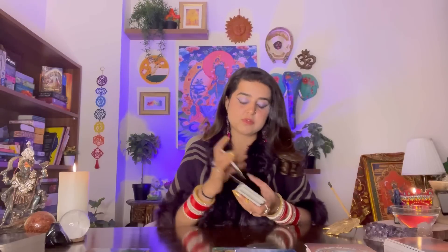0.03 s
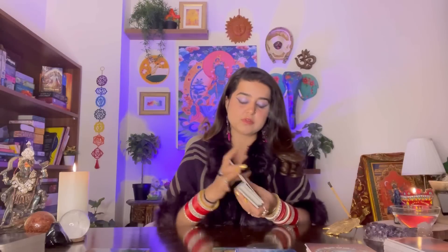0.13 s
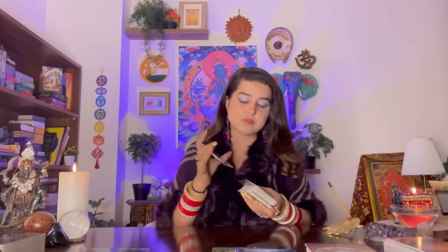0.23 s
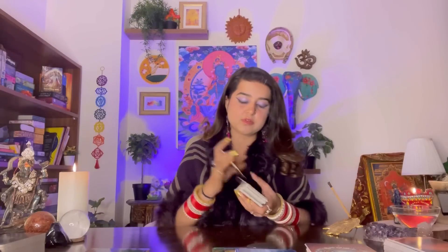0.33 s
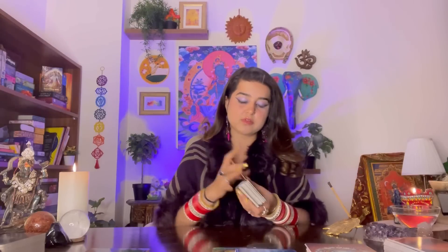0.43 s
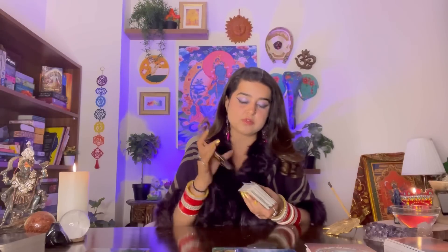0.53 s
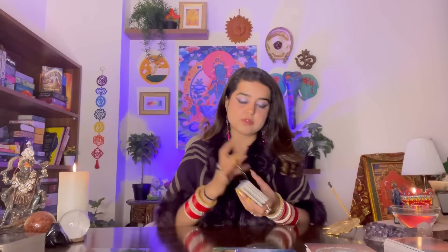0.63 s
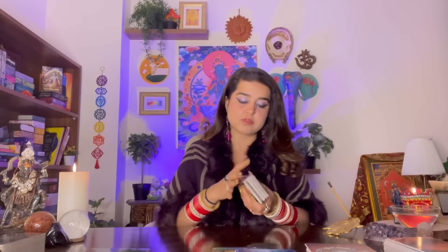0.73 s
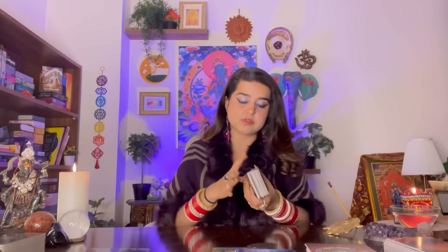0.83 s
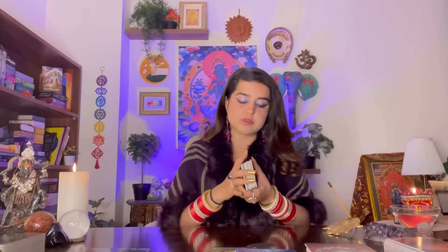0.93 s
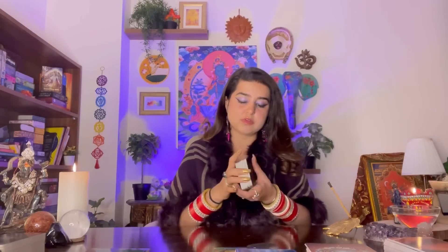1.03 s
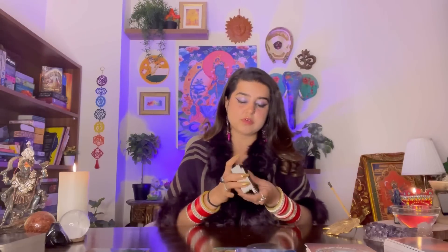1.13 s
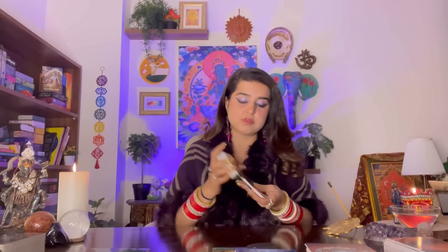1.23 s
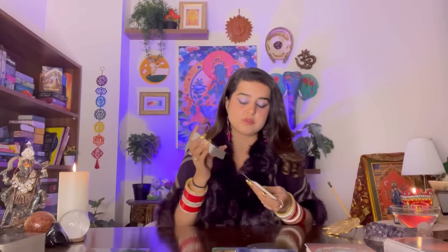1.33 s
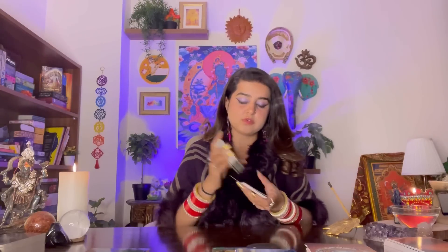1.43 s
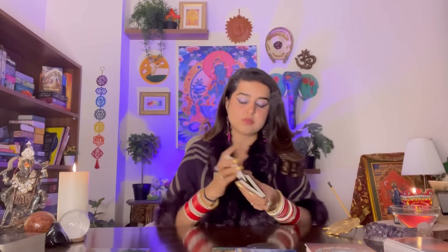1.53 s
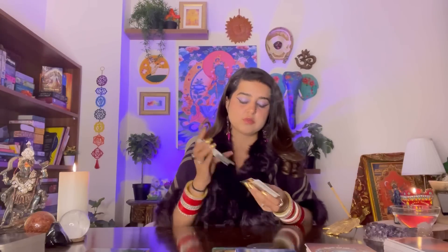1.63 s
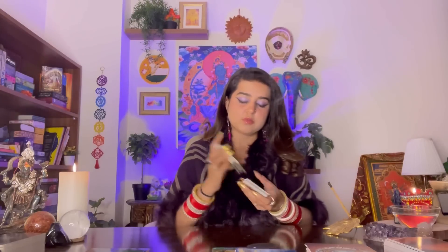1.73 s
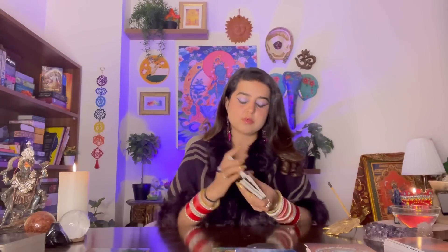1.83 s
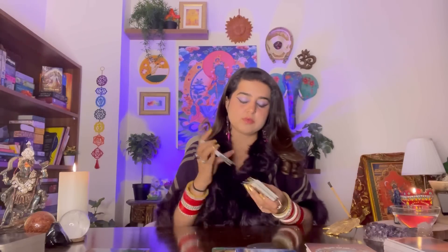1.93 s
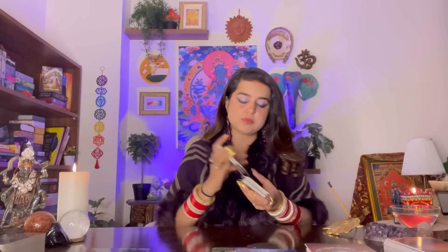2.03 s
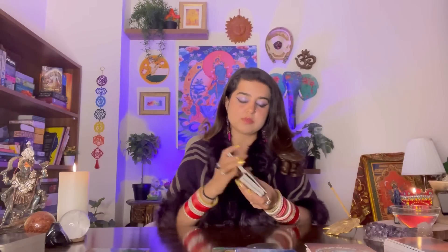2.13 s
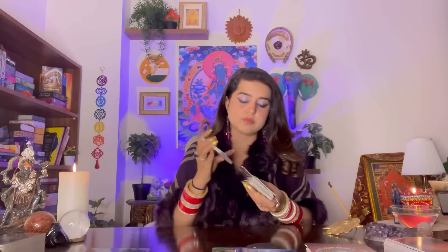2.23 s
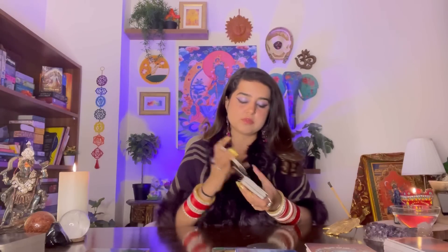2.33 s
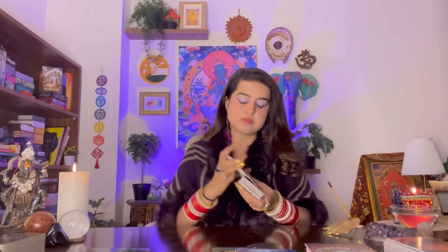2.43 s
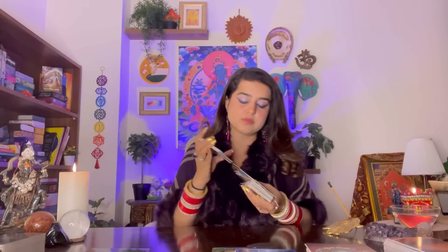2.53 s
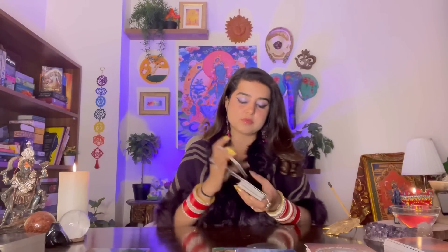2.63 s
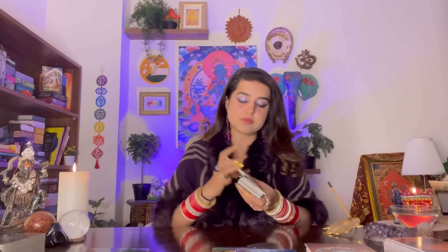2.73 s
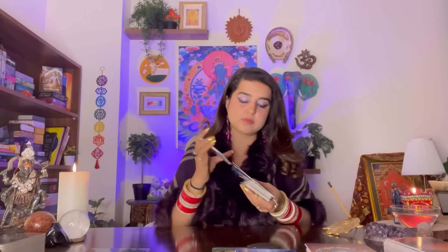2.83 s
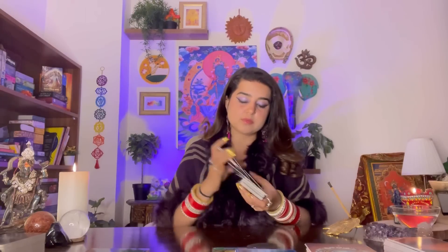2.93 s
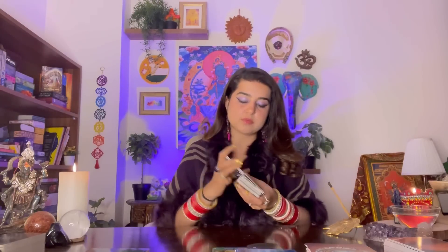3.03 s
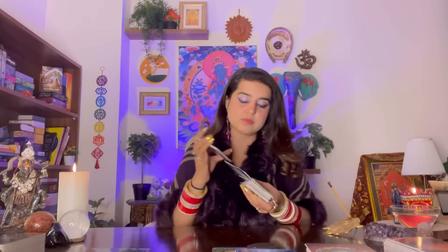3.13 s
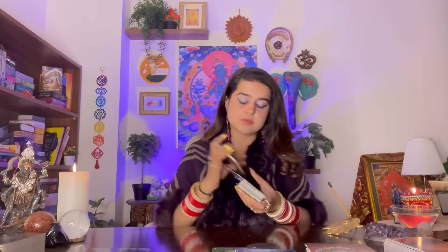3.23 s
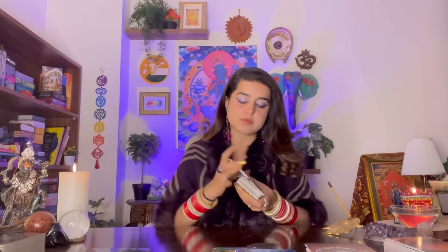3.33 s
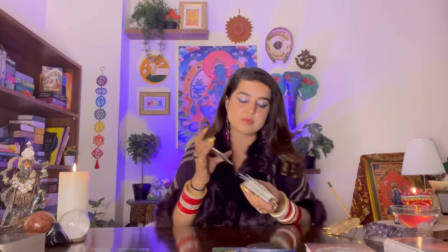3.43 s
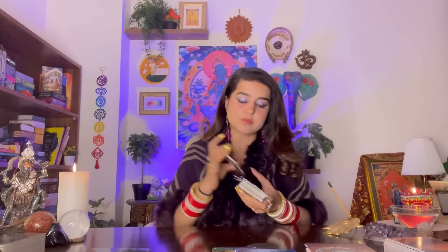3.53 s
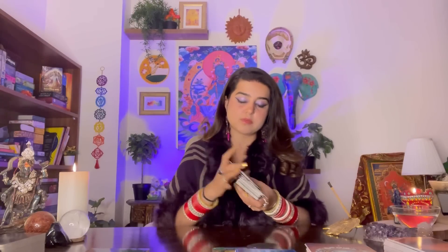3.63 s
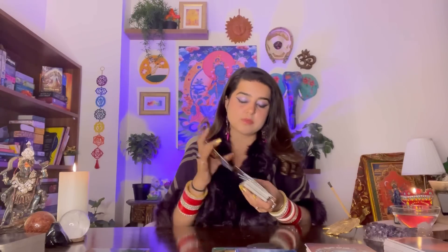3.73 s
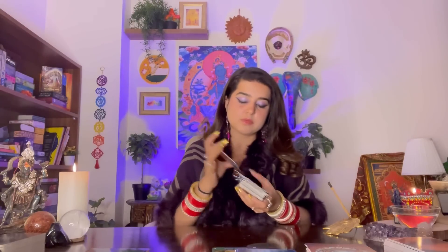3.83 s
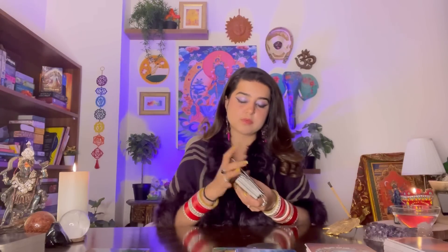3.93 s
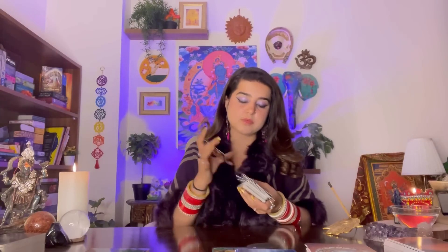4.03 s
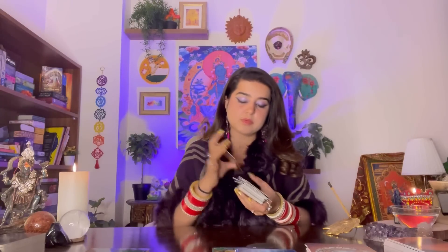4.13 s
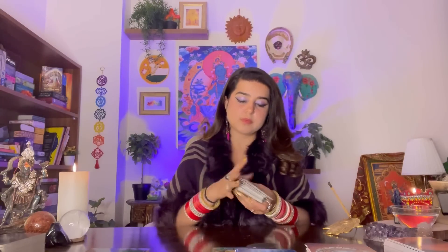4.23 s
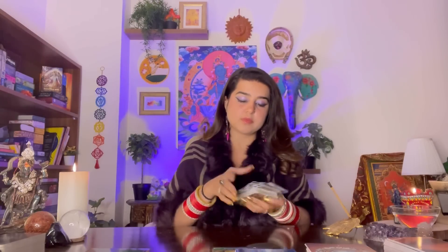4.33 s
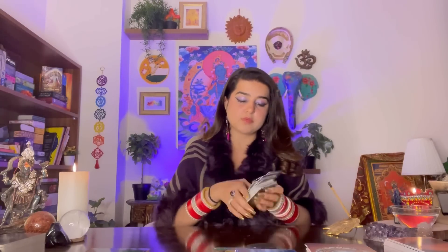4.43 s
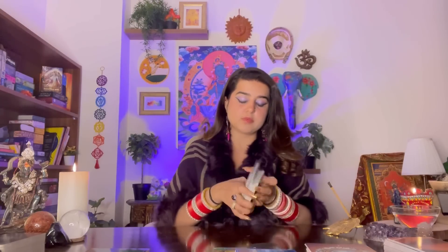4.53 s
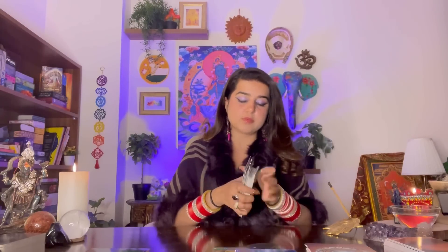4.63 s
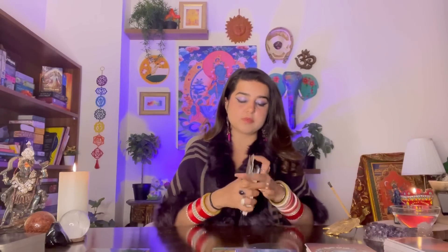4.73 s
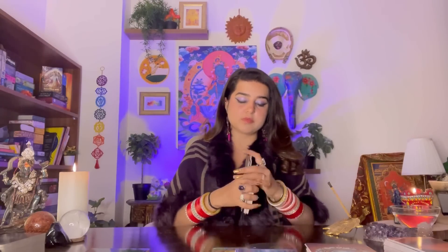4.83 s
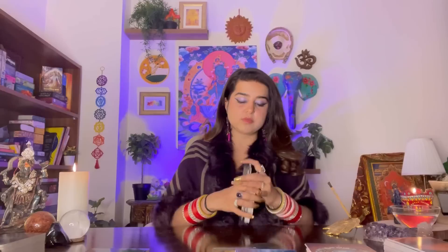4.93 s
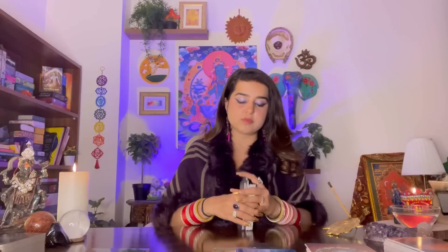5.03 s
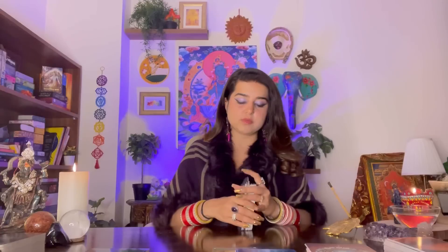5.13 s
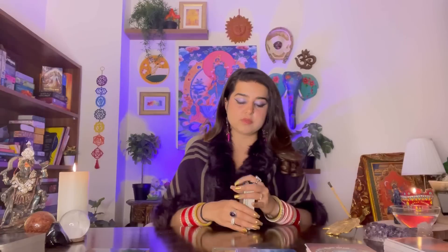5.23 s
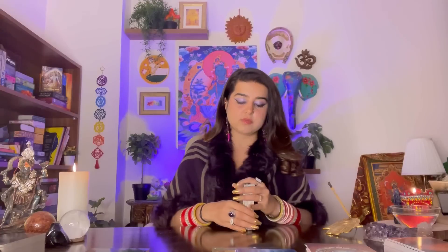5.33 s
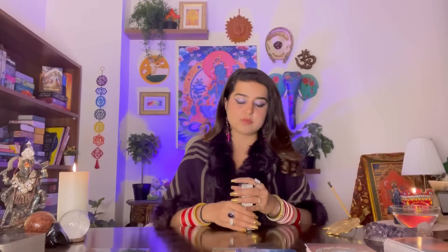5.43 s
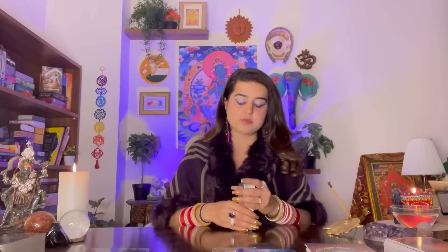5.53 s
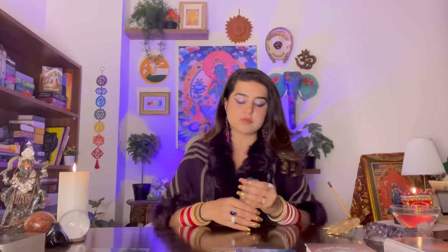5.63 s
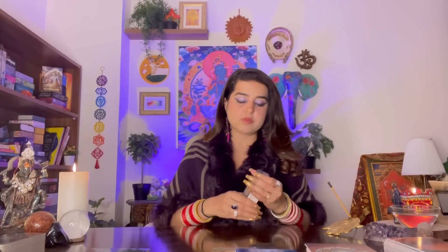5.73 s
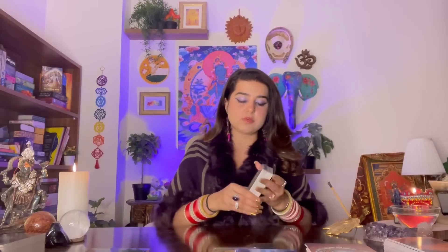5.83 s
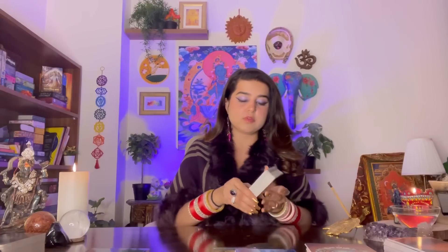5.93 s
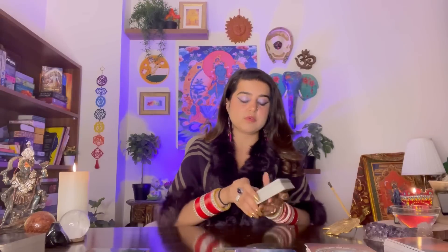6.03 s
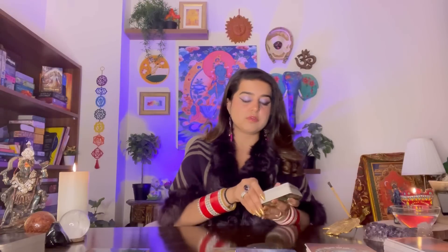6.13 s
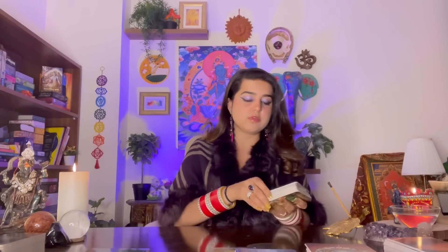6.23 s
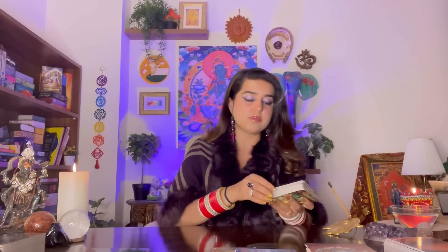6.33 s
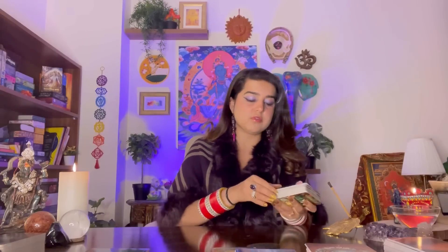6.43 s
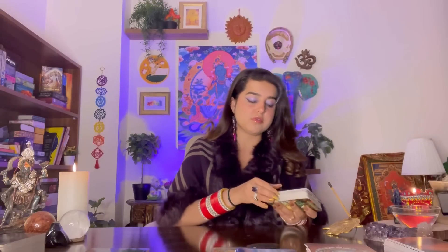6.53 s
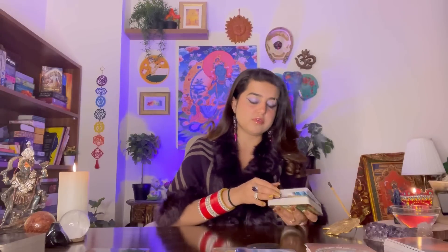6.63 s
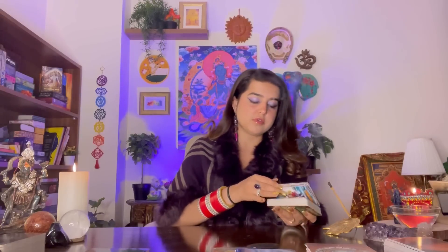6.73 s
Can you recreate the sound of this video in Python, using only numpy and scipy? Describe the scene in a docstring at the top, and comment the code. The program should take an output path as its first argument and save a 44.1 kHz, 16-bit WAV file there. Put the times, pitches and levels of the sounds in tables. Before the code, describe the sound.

A deck of cards slides and clicks in uneven bursts, knocks sharply on a tabletop, then settles into faint rustles over low room rumble.

```python
"""A deck of stiff cards is shuffled overhand a metre or two from a phone in a small furnished room.
Throughout, low resonances of the room rumble over a faint hiss, and the room rings a third of a second.
At first each packet slides off with a scrape, a hiss and at times a short whistle, and taps onto the pile.
Near 5 s the deck is knocked square on the table with hard cracks; quieter slides and taps follow.
Slides are noise through deck resonances; taps are short noise bursts that ring the same deck."""
import sys
import numpy as np
from scipy import signal
from scipy.fft import rfft, irfft, next_fast_len
from scipy.io import wavfile
from scipy.ndimage import uniform_filter1d

SR = 44100
rng = np.random.default_rng(int(sys.argv[2]) if len(sys.argv) > 2 else 0)


def waveform_to_disk(signal):
    """Save audio, clipped to [-1, 1], as 16-bit WAV at the path in sys.argv[1]."""
    frames = np.transpose(np.atleast_2d(signal))
    scaled = np.clip(frames, -1, 1) * 32767
    samples = np.round(scaled).astype(np.int16)
    wavfile.write(sys.argv[1], SR, samples)


N = 299863

# Low rumble resonances, set average level, wandering a few dB: centre_hz, width_hz, level_db
RUMBLE_MODES = [(30, 31, -72.5), (163.8, 33, -72.5), (284, 120, -77.5)]
# Faint background hiss spectrum: freq_hz, density_db_per_hz
HISS_SPECTRUM = [(350, -112), (700, -117), (1500, -118), (3000, -123), (6000, -127), (10000, -126),
                 (16000, -130)]
# Low resonances that wax and wane: centre_hz, width_hz
DRONE_MODES = [(60, 19), (99.7, 14), (134, 9), (184, 16), (220, 18)]
# Their levels, lowest first: time_s, level_1_db, level_2_db, level_3_db, level_4_db, level_5_db
DRONE_LEVELS = [(0.0, -66, -60.5, -59.5, -61.5, -60.5), (0.32, -57, -57.5, -67, -66.5, -63.5),
                (0.7, -58, -62.5, -67.5, -66, -61), (1.23, -68.5, -59, -67.5, -67.5, -64.5),
                (1.93, -54, -66, -56.5, -69, -63), (1.99, -60, -60.5, -67, -66.5, -67.5),
                (2.6, -59.5, -63.5, -61.5, -66.5, -64), (3.22, -57, -63.5, -65.5, -73, -70),
                (3.47, -61, -65, -73.5, -76, -75.5), (3.67, -60, -68.5, -58, -69, -67),
                (4.13, -61.5, -60.5, -62, -66, -70.5), (4.24, -54.5, -57, -60.5, -59.5, -65),
                (4.71, -59.5, -62.5, -60.5, -62.5, -69), (4.92, -61.5, -64, -57, -76, -82.5),
                (5.04, -54, -51.5, -56.5, -56, -50), (5.08, -44, -54, -56, -66.5, -70),
                (5.21, -63.5, -74, -54.5, -78, -85), (5.26, -56, -55.5, -53.5, -68, -65),
                (5.53, -72.5, -66, -54.5, -74, -71), (5.72, -64, -62.5, -57.5, -80, -84.5),
                (5.8, -71.5, -65.5, -71.5, -73, -91), (5.95, -61.5, -66, -70.5, -72, -91),
                (6.3, -65.5, -60.5, -62, -66, -75), (6.65, -59, -63.5, -61.5, -71.5, -66.5),
                (6.8, -62, -69, -70, -84, -79.5)]
# Part of each that is a tonal hum: power_share (0-1), lowest first
HUM_SHARE = [0.022, 0.11, 0.64, 0, 0.052]

# Deck end meets the table top: start_s, push_db
TABLE_PUSHES = [(4.241, -52), (5.009, -44), (5.272, -56)]
# Low table resonances: centre_hz, width_hz, gain_db
TABLE_MODES = [(69.3, 2.4, 0.5), (102.43, 21, -3.5), (220, 39, -2.5), (315, 50, -1)]

# Short narrow noise bands, whistles of sliding cards and low deck rings near 550-600 Hz:
# start_s, length_s, first_hz, last_hz, level_db
WHISTLES = [(0.127, 0.0323, 1720, 2100, -70), (0.202, 0.043, 1515, 1484, -69),
            (0.43, 0.035, 1845, 2014, -62), (0.945, 0.013, 4750, 4820, -65),
            (1.793, 0.047, 1266, 1477, -63), (2.084, 0.023, 1700, 1936, -56),
            (2.087, 0.015, 4493, 4485, -57), (2.714, 0.028, 2024, 1800, -60),
            (2.796, 0.021, 3905, 3841, -59), (2.95, 0.02, 3343, 3368, -69), (3.048, 0.017, 4620, 4527, -62),
            (3.085, 0.018, 2957, 3000, -66), (3.333, 0.025, 4250, 4530, -57),
            (3.384, 0.025, 2850, 3030, -60.5), (3.926, 0.0243, 2972, 3110, -55),
            (3.985, 0.043, 1822, 1700, -59), (5.004, 0.027, 557, 556, -40),
            (6.473, 0.058, 1596, 1676, -61.5), (6.487, 0.052, 2053, 2080, -66),
            (6.474, 0.08, 3200, 3170, -77), (6.478, 0.096, 597, 556, -68.5)]
WHISTLE_WIDTH_SHARE = 0.07  # noise cutoff as share of first_hz

# Deck resonances, low, middle: centre_hz, width_hz, gain_db
DECK_THUD = [(325, 200, 0.5), (542, 275, 3.5), (734, 398, 3), (1095, 760, -1)]
DECK_RING = [(1420, 680, -11), (1700, 584, 3.5), (2150, 207, 4), (2820, 3000, 0.5), (3010, 730, -3),
             (4120, 1100, -0.5)]
# Card edge resonances, treble and topmost: centre_hz, width_hz, gain_db
CARD_EDGE = [(5600, 6100, -2), (6280, 840, 5.5), (8410, 2020, -3)]
CARD_TOP = [(11670, 2590, 4.5), (12670, 3320, 9), (16800, 4400, 1)]
PACK_HZ = 3860  # low-pass corner of the thick pack

# Strokes of card on card: start_s, length_s, scrape_db, change_over_stroke_db, colour_hz,
# low_rustle_above_scrape_db, hiss_above_scrape_db, top_above_scrape_db
STROKES = [(0.0, 0.036, -70.5, -31, 1320, 24.5, 8.5, -15.5), (0.049, 0.14, -56, -4, 2024, -1.5, -1, -8),
           (0.174, 0.25, -63, -12.5, 1540, 4, -11, -21.5), (0.364, 0.127, -53, -15.5, 1880, -2, 3.5, -1),
           (0.433, 0.16, -52, -18.5, 1740, 1, -10, -11), (0.678, 0.14, -45.5, -36, 3580, -11, 4, -3),
           (0.897, 0.16, -67, -15, 2290, -1.5, 4.5, -2), (0.936, 0.034, -68, -6, 3960, -10, 8.5, 1),
           (1.097, 0.15, -72, -1, 2390, -4.5, 5, -0.5), (1.235, 0.052, -62, 1, 2470, 3, -3, -7.5),
           (1.405, 0.048, -90, -6.5, 2250, 14.5, -2.5, -16), (1.46, 0.044, -56, 4, 2040, -4, -2, -7),
           (1.5, 0.098, -52, -6.5, 2010, -9.5, -5, -7.5), (1.773, 0.045, -48.5, -8, 1620, -1.5, -2, -3),
           (1.841, 0.074, -62.5, -4, 1620, -3, 5, -5), (2.067, 0.043, -57, -6.5, 1760, 3, 3, -2.5),
           (2.132, 0.096, -66.5, 1, 2350, 2, 6.5, 3.5), (2.351, 0.11, -57, -17, 2370, -1, 3.5, -1),
           (2.435, 0.064, -63.5, -3.5, 2250, -13, 7, 0.5), (2.64, 0.092, -66.5, 0, 1970, 1.5, 6.5, 2.5),
           (2.736, 0.068, -63, -15, 1980, -4, 9, 11), (2.75, 0.24, -61, -19.5, 3510, -23, 1, 0.5),
           (2.94, 0.051, -58.5, -9.5, 3030, -3.5, 7, 7.5), (3, 0.12, -69, -1, 2591, -5, 11, 4),
           (3.246, 0.08, -63, -1, 2345, -6.5, 5, 1.5), (3.323, 0.084, -62.5, -3, 2910, -1, 6.5, -3),
           (3.581, 0.066, -40, -31, 2440, -4.5, -9.5, -21), (3.636, 0.12, -56.5, -8, 2400, 0.5, 2, -3),
           (3.872, 0.064, -68.5, 9, 2370, 0, 0.5, -11), (3.916, 0.12, -51, -11.5, 2000, -5, -9, -19),
           (4.188, 0.0171, -65.5, 9.5, 2170, 7, 7.5, -3), (4.209, 0.13, -44, -22, 2363, -10, -6.5, -32),
           (4.355, 0.19, -72, 0, 2250, 0, 2, -7.5), (4.516, 0.063, -67, -4, 2030, 3.5, 5.5, -1.5),
           (4.614, 0.26, -74, -6, 2120, -2, -2.5, -10), (4.896, 0.16, -72, 6.5, 2517, -1, 6.5, -4.5),
           (4.983, 0.037, -23, -21.5, 1976, -10, -37.5, -39), (5.145, 0.06, -69, 3, 2150, -11.5, -8, -16),
           (5.22, 0.035, -49, 1, 1900, -8.5, -15, -18.5), (5.262, 0.078, -47, -45, 2924, -4.5, -14.5, -41),
           (5.327, 0.099, -58.5, -17.5, 1910, -11.5, -21, -42), (5.502, 1.35, -98.5, 4, 2584, 5.5, -2, -19),
           (5.814, 0.03, -70, -15, 2077, 0, 2, -15), (6.004, 0.029, -89.5, -20, 2260, -4, 15, 24),
           (6.086, 0.036, -86.5, -7, 2590, -6, 7.5, 3), (6.161, 0.07, -63, -21, 1845, 2, -6.5, -9),
           (6.413, 0.024, -73.5, -27, 1760, 1, 15, 17.5),
           (6.467, 0.15, -61.5, -17.5, 1630, 5.5, -18, -41.5),
           (6.62, 0.11, -80.5, -4, 1600, -10, -16, -24.5), (6.76, 0.084, -85.5, 21.5, 1890, 4, 2, -10)]
# Multiplier of change_over_stroke_db per layer: scrape, low_rustle, hiss, top (ratios)
CHANGE_SHARE = [1.435, 1.084, 1.02, 1.076]
BITE_S, LET_GO_S = 0.0096, 0.0069  # grip rise time, decay constant as cards part

# Packets landing and deck knocking: start_s, peak_db, pitch_hz, thud_above_ring_db, crack_above_ring_db
BLOWS = [(0.058, -43, 2340, -24, -14), (0.0954, -43, 4140, -17, 1), (0.103, -49, 1510, -2, -12.5),
         (0.1278, -36.5, 1700, -9, -24), (0.143, -48, 1980, 8.5, -6), (0.217, -54, 1650, -15, -9),
         (0.265, -57, 1500, 2.5, -16), (0.309, -58, 1700, 5, -3), (0.391, -32, 1700, -4, -3),
         (0.436, -34, 1800, -20.5, -16), (0.451, -39, 1880, -5, -11.5), (0.676, -43, 3800, -7, 12),
         (0.678, -37.5, 2420, -7, 10), (0.6795, -40, 4300, -22, 10.5), (0.693, -42.5, 4200, 4.5, 9),
         (0.685, -53, 3990, -3, 6), (0.6877, -40, 4320, 3, -13), (0.797, -53, 1280, -14, -6),
         (0.9068, -57.5, 2090, 5.5, -4.5), (1.1207, -61, 2260, -11, 15.5), (1.133, -47, 2410, -30.5, 1),
         (1.2445, -64, 3280, -8.5, 7), (1.4684, -52.5, 2040, 10, -2), (1.505, -31, 2040, -4, -3),
         (1.5075, -33, 780, 5, -2), (1.5145, -30.5, 2380, -9, -4), (1.5171, -37.5, 3170, -8, -3),
         (1.533, -36, 1490, -5, -10), (1.7915, -42, 1200, -9, -6), (1.811, -38.5, 2120, -10, -15),
         (1.822, -45, 2300, 0, -11), (1.905, -57, 1360, 10.5, -10), (2.0845, -38, 1670, -12, -10),
         (2.1, -40, 1900, -6.5, -6.5), (2.121, -49, 1300, 1, -7.5), (2.3993, -43.5, 1670, -18, -13),
         (2.489, -49, 1370, 9, -17), (2.643, -77, 1300, 1, 2), (2.678, -50, 1300, 6, 0),
         (2.719, -35, 1930, -12, -24), (2.738, -48.5, 1300, -1, -10), (2.8142, -45, 3700, -38, -5),
         (3.1124, -49, 1310, 7.5, -20), (3.118, -50.5, 990, 2, -14), (3.2955, -42, 795, -5, -16),
         (3.314, -53, 800, -3, -12), (3.325, -50, 1390, 5, -10.5), (3.408, -51.5, 2020, 8, -9.5),
         (3.592, -36.5, 2100, 3.5, -19.5), (3.605, -48, 1000, 7, -15.5), (3.6904, -52.5, 1850, -11, 10),
         (3.729, -48.5, 2100, 4.5, -11), (3.8903, -56, 3820, 0, 7), (3.902, -64, 1300, 6, -3.5),
         (3.9287, -27, 2360, -12.5, -18), (3.9374, -33, 2240, -18, -21), (4.0017, -40.5, 2230, 0, -9),
         (4.211, -33, 1940, -6, -9.5), (4.219, -34, 2170, -5, -14), (4.229, -35, 1700, -7, -12),
         (4.528, -51, 2030, 4, -6), (4.591, -46, 1517, 3, -2.5), (4.6633, -54, 1379, -7, 2.5),
         (4.853, -70.5, 4180, 0, 17.5), (4.77, -59.5, 1870, -12.5, -11.5), (4.886, -56, 2070, 3.5, 1.5),
         (4.984, -24.5, 1400, -9, -23.5), (4.9876, -12.5, 1270, -15.5, -20.5),
         (4.9935, -11, 2114, -15.5, -23), (4.996, -9, 1950, -20.5, -19.5), (5.001, -18, 1780, -13, -18),
         (5.005, -21, 1646, -7.5, -15), (4.9906, -12.5, 940, -10, -22), (5.009, -18.5, 1000, -9, -21.5),
         (5.017, -22.5, 2000, 0.5, -20.5), (5.024, -24, 2044, -5.5, -14), (5.029, -23.5, 2330, 0, -18.5),
         (5.036, -24, 2068, 2, -12), (5.062, -29.5, 1780, -3.5, -13), (5.178, -39.5, 2090, -3, -22.5),
         (5.1891, -28, 2110, -9, -32), (5.2355, -31.5, 2090, -13.5, -28), (5.246, -30, 1866, -6.5, -22.5),
         (5.2579, -15, 2116, -12.5, -4), (5.2669, -32.5, 2656, -6, -1), (5.276, -35.5, 2350, -2.5, 10.5),
         (5.3304, -26.5, 2150, -7.5, -6), (5.334, -28, 1300, -5.5, -10), (5.344, -32.5, 1220, -13, -32),
         (5.6595, -69, 2090, -1.5, -0.5), (5.823, -61, 2150, -14, -11.5), (6.0138, -88, 4350, -5.5, 27),
         (6.1703, -61.5, 2180, 4.5, 4), (6.4117, -78.5, 3360, -8, 24.5), (6.4747, -47.5, 1630, -23, -20),
         (6.496, -53, 2100, -17, -35), (6.501, -46, 1630, -15, -27.5), (6.511, -54, 1610, -22, -37),
         (6.576, -55.5, 1480, -2, -31), (6.6, -64, 1420, -3.5, 6)]
# Treble resonances of blows on the table: centre_hz, width_hz, gain_db
TABLE_SLAP = [(3340, 3100, 0.5), (6350, 1800, -0.5)]
TABLE_START_S, TABLE_END_S = 4.95, 5.4  # blows in this span land on the table top
HAND_SETTLE_S, TABLE_SETTLE_S = 0.0042, 0.0024  # decay constants of settling cards
POCKET_WIDTH_SHARE = 0.36  # pocket width / pitch

# Room reverberation: freq_hz, t60_s
ROOM_T60 = [(150, 0.69), (400, 0.4), (900, 0.33), (2000, 0.33), (5000, 0.35), (10000, 0.204), (15000, 0.14)]
SLIDE_ROOM_DB, TAP_ROOM_DB, TAIL_RISE_S = 4.5, -4.5, 0.0025
TABLE_LEFT_LAG_S = 0.00044  # deck on the table is nearer the right port
BOUNCE_LAGS_S, BOUNCE_DB = (0.0011, 0.0007), -12.5  # left, right; table mirrors the raised hands

# Power common to both microphone ports: freq_hz, power_share (0-1)
PORT_SHARE = [(100, .62), (300, .3), (600, .06), (4500, .06), (6000, .3), (8000, .7), (16000, .75)]
# Port balance: freq_hz, left_minus_right_db
LEFT_LEAN = [(100, -0.6), (1000, 3.5), (6500, 0.5), (8500, 0)]
LEFT_LAG_S, LAG_ZERO_HZ, TOP_HZ = 0.0002554, 420, 15900


def undb(db):
    """Decibels to amplitude."""
    return 10 ** (np.asarray(db) / 20)


def unit(x):
    """Scale to RMS 1 along the last axis."""
    return x / np.sqrt(np.mean(x ** 2, axis=-1, keepdims=True))


def on_axis(table, size):
    """Read a (freq_hz, value) table at the FFT bins, on a log frequency axis."""
    hz, value = np.transpose(table)
    bin_hz = np.arange(size // 2 + 1) * SR / size
    return np.interp(np.log(bin_hz + 1), np.log(hz), value)


def ring(x, modes):
    """Sum of resonators (centre_hz, width_hz, gain_db) of alternating sign."""
    total = 0
    for k, (hz, width_hz, gain_db) in enumerate(modes):
        b, a = signal.iirpeak(hz, hz / width_hz, SR)
        total = total + (-1) ** k * undb(gain_db) * signal.lfilter(b, a, x)
    return total


def dull(x, hz):
    """Two-pole low-pass."""
    b, a = signal.butter(2, hz, fs=SR)
    return signal.lfilter(b, a, x)


def walk(rate_hz):
    """Random levels, one per 1 / rate_hz, slewed from each to the next; RMS near 1.6."""
    hold = int(SR / rate_hz)
    steps = np.repeat(rng.standard_normal(N // hold + 1), hold)
    return 1.95 * uniform_filter1d(steps, hold)[:N]


def background():
    """Low resonances swell, nearly alike at both ports, part of some a hum, over a faint hiss."""
    size = next_fast_len(N)
    t = np.arange(N) / SR
    hiss_spectrum = rfft(rng.standard_normal((2, size))) * undb(on_axis(HISS_SPECTRUM, size))
    out = irfft(hiss_spectrum, size)[:, :N] * np.sqrt(SR / 2)
    time_s, *drone_db = np.transpose(DRONE_LEVELS)
    drones = [(hz, width_hz, np.interp(t, time_s, db)) for (hz, width_hz), db in zip(DRONE_MODES, drone_db)]
    modes = [*drones, *RUMBLE_MODES]
    hum_shares = [*HUM_SHARE] + [0] * len(RUMBLE_MODES)
    for (hz, width_hz, level_db), hum in zip(modes, hum_shares):
        mid, side = rng.standard_normal((2, N))
        noise = mid + 0.67 * side * np.array([[1], [-1]])
        rumble = ring(ring(noise, [(hz, width_hz, 0)]), [(hz, 3 * width_hz, 0)])
        hum_hz = hz * (1 + 0.00812 * walk(2.0))
        tone = np.sqrt(2) * np.sin(2 * np.pi * np.cumsum(hum_hz) / SR)
        gain = undb(level_db + 1.59 * walk(2.628))
        out = out + gain * (np.sqrt(1 - hum) * unit(rumble) + np.sqrt(hum) * tone)
    return out


def thumps():
    """A soft push of 3.3 ms sets the table top ringing."""
    push = np.zeros(N)
    for start_s, push_db in TABLE_PUSHES:
        push[int(start_s * SR)] = undb(push_db) * SR / 40
    return ring(uniform_filter1d(push, int(0.0033 * SR)), TABLE_MODES)


def whistles():
    """Card whistles and low deck rings: narrow noise bands, most gliding, swell fast, hold and fade."""
    out = np.zeros(N)
    for start_s, length_s, first_hz, last_hz, level_db in WHISTLES:
        age_s = np.arange(int(1.6 * length_s * SR)) / SR
        hz = np.interp(age_s, [0, length_s], [first_hz, last_hz])
        sway = dull(rng.standard_normal((2, 16384)), WHISTLE_WIDTH_SHARE * first_hz)
        sway = sway[:, 1000:1000 + len(age_s)]  # skip the filter start
        phase = 2 * np.pi * np.cumsum(hz) / SR
        tone = unit(sway[0] * np.cos(phase) + sway[1] * np.sin(phase))
        shape = np.clip(age_s / 0.007, 0, 1) * np.exp(-(age_s / length_s) ** 3)
        start = int(start_s * SR)
        out[start:start + len(age_s)] += undb(level_db) * tone * shape
    return out


def stroke_forces():
    """A stroke grips fast and dies away as the cards part; gives four layer levels and scrape colour."""
    t = np.arange(N) / SR
    force = np.zeros((4, N))
    colour_hz = np.full(N, 2000.0)
    for start_s, length_s, scrape_db, change_db, hz, *above_db in STROKES:
        span = slice(int(start_s * SR), int((start_s + length_s + 12 * LET_GO_S) * SR))
        age_s = t[span] - start_s
        grip = np.clip(age_s / BITE_S, 0, 1) * np.exp(-np.maximum(age_s - length_s, 0) / LET_GO_S)
        progress = np.minimum(age_s / length_s, 1)
        for k, db in enumerate([0] + above_db):
            force[k, span] += grip * undb(scrape_db + db + CHANGE_SHARE[k] * change_db * progress)
        colour_hz[span] = hz
    return force, colour_hz


def slides():
    """Card faces catch and slip: grainy noise shakes the deck and hisses off the edges."""
    (scrape, low, hiss, top), colour_hz = stroke_forces()
    catch = undb(5.32 * walk(250) + 1.3 * walk(40))
    # single card edges let go with a tick, a few louder than the rest
    tick_on = rng.random(N) < 260 / SR
    ticks = tick_on * undb(17.5 + 1.7 * np.minimum(rng.exponential(size=N), 2.5))
    grain = rng.standard_normal(N) * catch
    rough = grain + ticks
    fine = rng.standard_normal(N) * catch ** 0.547 + 0.29 * ticks
    # grip favours modes near the scrape colour; each comes and goes as fingers shift
    body = 0
    for mode in DECK_RING:
        patchy = undb(2.5 * walk(22.004))
        favour = 1 / (1 + (np.log(colour_hz / mode[0]) / 0.21) ** 2)
        body = body + ring(scrape * rough * patchy * favour, [mode])
    rustle = ring(low * (grain + 0.33 * ticks), DECK_THUD)
    edges = ring(hiss * fine, CARD_EDGE) + undb(1.5) * ring(top * fine, CARD_TOP)
    return dull(undb(2.0) * body + undb(5.5) * rustle, PACK_HZ) + edges


def taps():
    """Each blow, a click and a few ms of settling cards, drives the deck's thud, ring and crack."""
    size = 2048
    start_s, peak_db, pitch_hz, thud_db, crack_db = np.transpose(BLOWS)
    on_table = ((start_s > TABLE_START_S) & (start_s < TABLE_END_S))[:, None]
    settle_s = np.where(on_table, TABLE_SETTLE_S, HAND_SETTLE_S)
    blow = rng.standard_normal((len(start_s), size)) * np.exp(-np.arange(size) / (settle_s * SR))
    blow[:, 0] = 3  # click
    # air pocket between packet and pile has its own pitch at each blow
    pocket = []
    for one_blow, hz in zip(blow, pitch_hz):
        width_hz = POCKET_WIDTH_SHARE * hz
        pocket.append(ring(ring(one_blow, [(hz, width_hz, 0)]), [(hz, 2 * width_hz, 0)]))
    deck_ring = np.array(pocket) + undb(-16.0) * dull(ring(blow, DECK_RING), PACK_HZ)
    thud = dull(ring(blow, DECK_THUD[1:]), PACK_HZ)  # too short to stir the lowest mode
    table_crack = dull(ring(blow, TABLE_SLAP), 11000.0)
    hand_crack = ring(blow, CARD_EDGE) + undb(-4.0) * ring(blow, CARD_TOP)
    crack = np.where(on_table, table_crack, hand_crack)
    sound = 0
    for part, db in [(deck_ring, peak_db), (thud, peak_db + thud_db), (crack, peak_db + crack_db)]:
        sound = sound + part / np.abs(part).max(axis=1, keepdims=True) * undb(db)[:, None]
    out = np.zeros(N + size)
    for start, one in zip((start_s * SR).astype(int), sound):
        out[start:start + size] += one
    return out[:N]


def room_tail(size):
    """Dense echoes, different at each port, that decay at a rate set per band."""
    t = np.arange(size) / SR
    noise = rfft(rng.standard_normal((2, size)))
    tail = 0
    for k, (_, t60_s) in enumerate(ROOM_T60):
        band = on_axis([(hz, float(j == k)) for j, (hz, _) in enumerate(ROOM_T60)], size)
        tail = tail + irfft(noise * band) * 1000.0 ** (-t / t60_s)
    tail = tail * np.clip(t / TAIL_RISE_S, 0, 1) ** 2  # echoes thicken as the walls answer
    return unit(tail) / np.sqrt(size)


def room(slide, tap):
    """Direct sound and room echoes, plus a table reflection while the deck is in the hands."""
    sent = undb(SLIDE_ROOM_DB) * slide + undb(TAP_ROOM_DB) * tap
    echoes = signal.fftconvolve(sent[None], room_tail(32768), axes=1)[:, :N]
    direct = slide + tap
    sample = np.arange(N)
    on_table = (sample > TABLE_START_S * SR) & (sample < TABLE_END_S * SR)
    left = np.where(on_table, np.roll(direct, round(TABLE_LEFT_LAG_S * SR)), direct)
    bounce = np.array([np.roll(direct, round(lag_s * SR)) for lag_s in BOUNCE_LAGS_S])
    return np.array([left, direct]) + undb(BOUNCE_DB) * bounce * ~on_table + echoes


def scene():
    """Card and table sounds in the room, over the background."""
    return room(slides() + whistles(), taps() + thumps()) + background()


def record(dry):
    """The left port mixes in a share of the right, lagged above LAG_ZERO_HZ; the top is cut."""
    size = next_fast_len(N)
    left, right = rfft(dry, size)
    share = on_axis(PORT_SHARE, size)
    hz = np.arange(len(left)) * SR / size
    late = right * np.exp(-2j * np.pi * np.maximum(hz - LAG_ZERO_HZ, 0) * LEFT_LAG_S)
    left = np.sqrt(share) * late + np.sqrt(1 - share) * left
    lean = undb(on_axis(LEFT_LEAN, size) / 2)  # half the difference to each port
    ports = irfft(np.array([left * lean, right / lean]), size)[:, :N]
    return signal.sosfilt(signal.ellip(8, 0.2, 70, TOP_HZ, fs=SR, output="sos"), ports)


dry = scene()
out = record(dry)
waveform_to_disk(out)
```